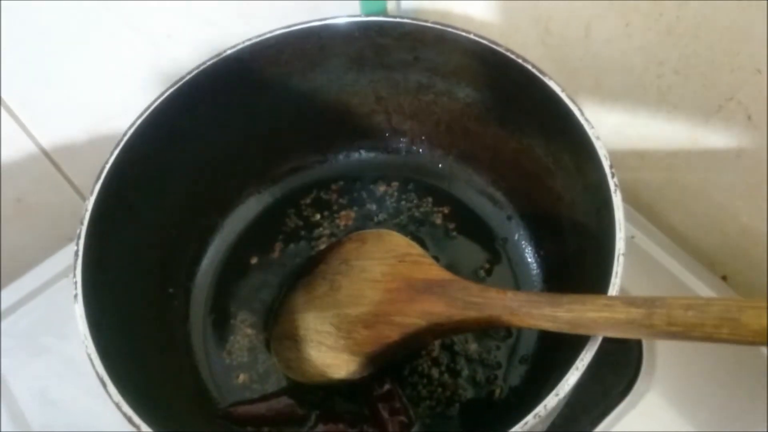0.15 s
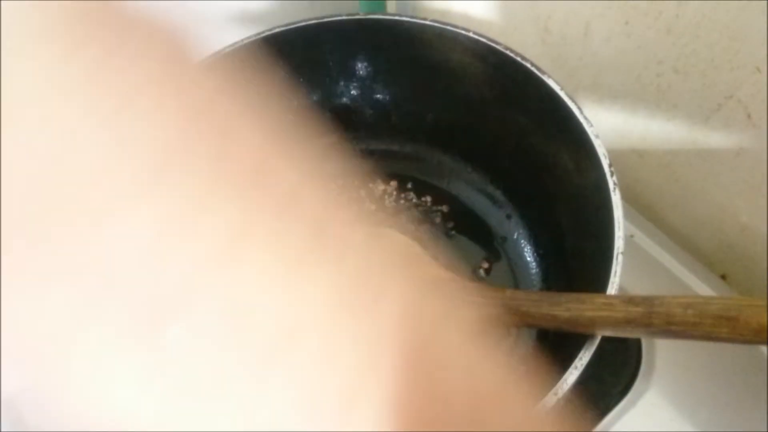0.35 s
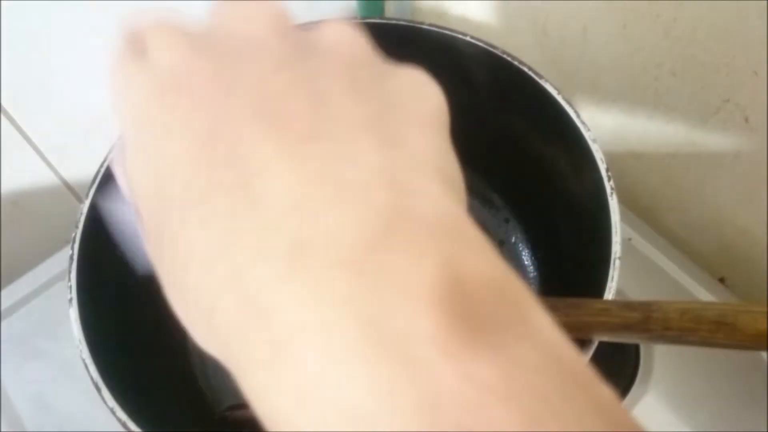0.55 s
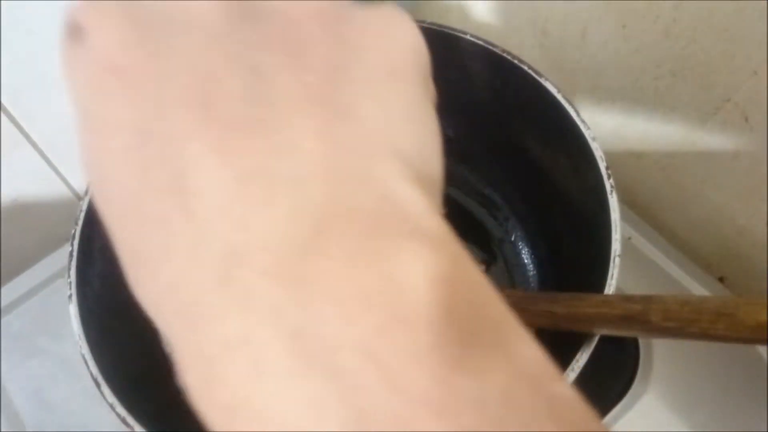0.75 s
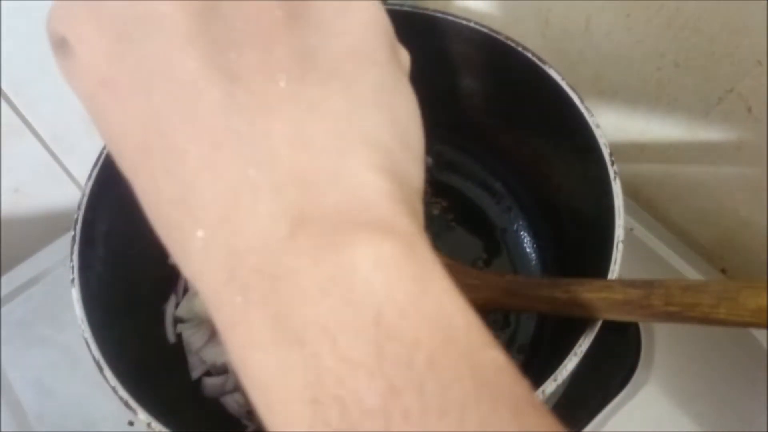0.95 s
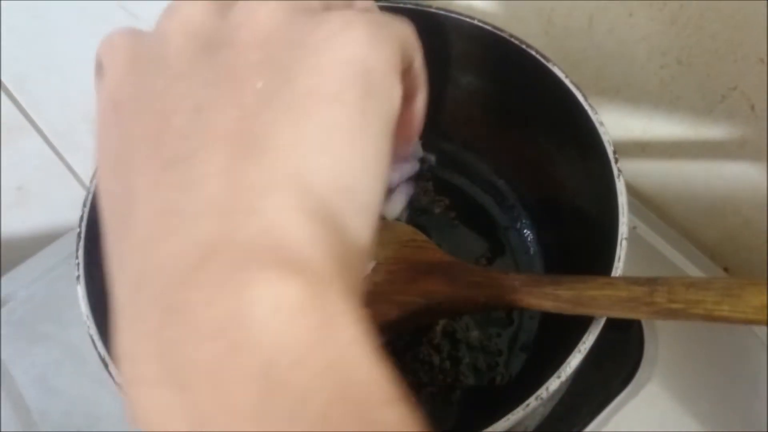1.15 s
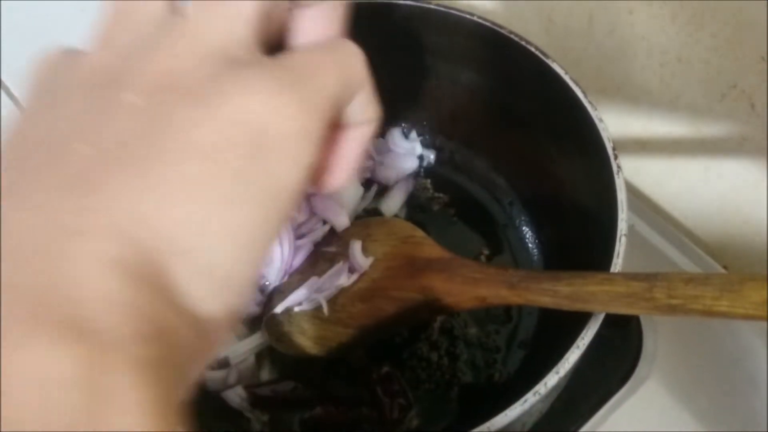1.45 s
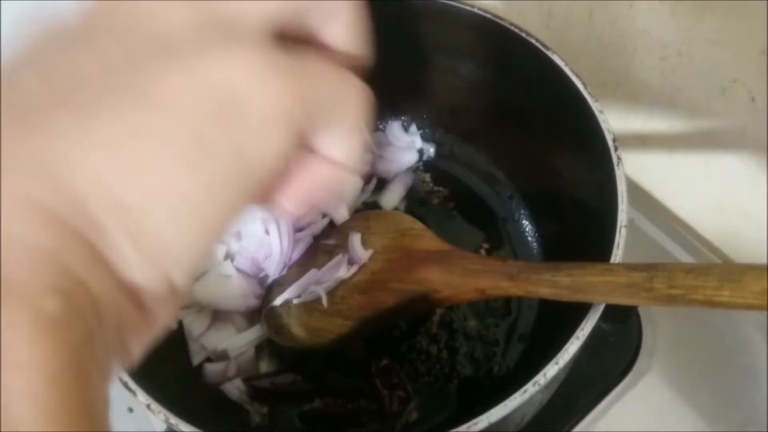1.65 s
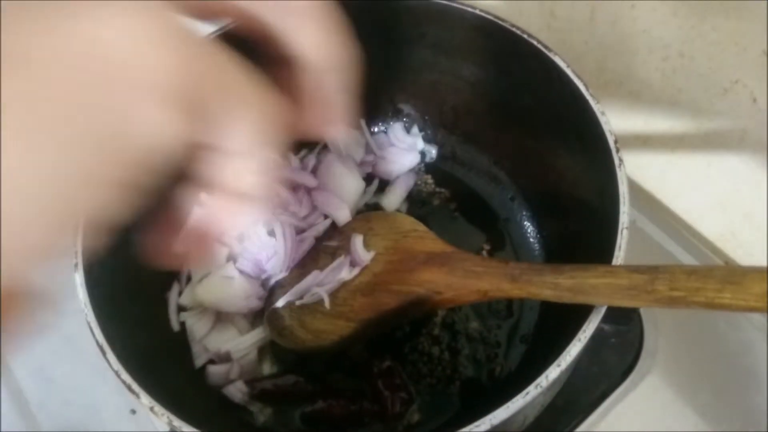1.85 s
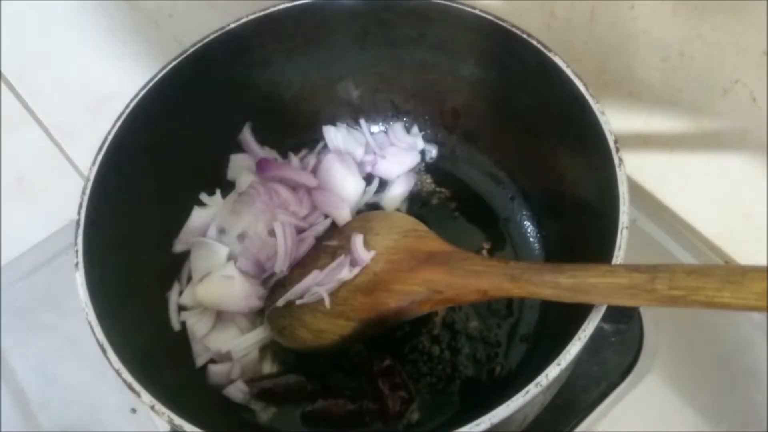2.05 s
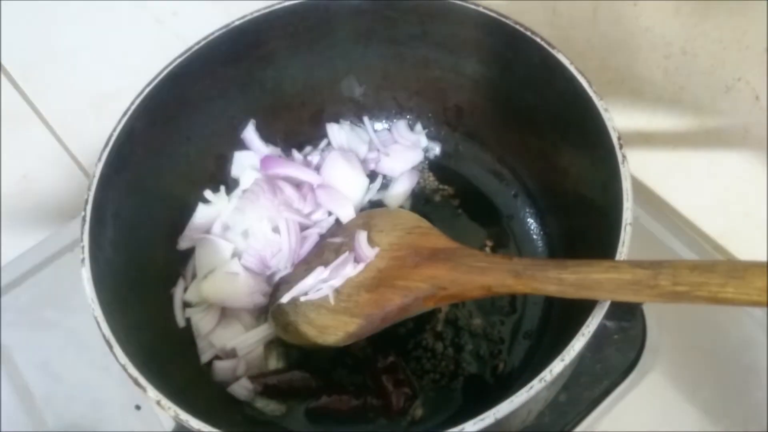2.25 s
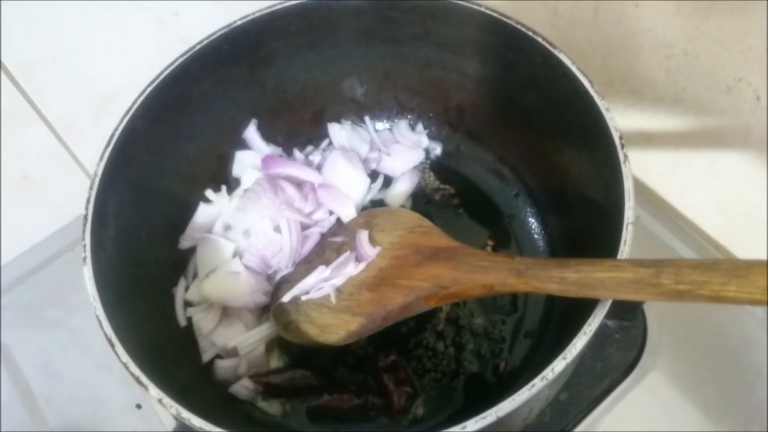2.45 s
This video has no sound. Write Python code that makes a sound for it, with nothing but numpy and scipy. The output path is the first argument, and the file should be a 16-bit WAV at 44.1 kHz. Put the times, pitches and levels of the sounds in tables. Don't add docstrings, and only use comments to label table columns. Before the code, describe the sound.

Onions dropped in hot oil sizzle fiercely after a hushed start with faint rustle and air puffs; the first surge eases into steady frying with snapping pops, heard close up in a small hard-walled kitchen.

```python
import sys
import numpy as np
from scipy import signal
from scipy.fft import rfft, irfft
from scipy.io import wavfile
from scipy.ndimage import uniform_filter1d

SR = 44100
rng = np.random.default_rng(int(sys.argv[2]) if len(sys.argv) > 2 else 0)


def attenuation_scalar(level_db):
    decades = np.asarray(level_db, float) / 20
    return 10 ** decades


def wrap_up_sound(samples):
    columns = np.atleast_2d(samples).T
    tamed = np.clip(columns, -1, 1)
    steps = np.round(tamed * 32767).astype(np.int16)
    wavfile.write(sys.argv[1], SR, steps)


N = 114660
LEAD_S, LEAD_SPREAD_S = .00022, .00015


def evened(x):
    return x / np.sqrt(np.mean(x ** 2) + 1e-20)


def read(points, hz):
    f, value = np.transpose(points)
    return np.interp(np.log(hz + 1), np.log(f), value)


def curve(table, col):
    table = np.array(table)
    return np.interp(np.arange(N) / SR, table[:, 0], table[:, col])


def add(mix, s, sound):
    part = mix[:, round(s * SR):][:, :sound.shape[1]]
    part += sound[:, :part.shape[1]]


def bins():
    return np.fft.rfftfreq(4096, 1 / SR)


def colour(x, db):
    cep = irfft(np.log(attenuation_scalar(np.maximum(db, -100))), axis=-1)
    cep[..., 1:2048] *= 2
    cep[..., 2049:] = 0
    response = irfft(np.exp(rfft(cep, axis=-1)), axis=-1)
    return signal.oaconvolve(x, response, axes=-1)[..., :N]


def high_pass(x, hz):
    return signal.sosfilt(signal.butter(2, hz, "high", fs=SR, output="sos"), x)


def slow(hz, order=4):
    low_pass = signal.butter(order, hz, fs=SR, output="sos")
    return evened(signal.sosfilt(low_pass, rng.standard_normal(N + 9000))[9000:])


def tail(t60, delay_s, seconds):
    t = np.arange(int(seconds * SR)) / SR
    h = rng.standard_normal((2, len(t))) * (rng.random((2, len(t))) < .15)
    h = h * attenuation_scalar(-60 * t / t60) * (t > delay_s)
    return h / np.linalg.norm(h, axis=1, keepdims=True)


def ring(hz, t60, rise_s, glide, count=700):
    t = np.arange(count) / SR
    loudness = (1 - np.exp(-t / rise_s)) * attenuation_scalar(-60 * t / t60)
    return loudness * np.sin(2 * np.pi * hz * t * (1 + glide * t / t60))


def place(sound, lead_s, pan_db):
    lag = int(np.clip(round(lead_s * SR), 0, 40))
    both = np.array([np.r_[sound, np.zeros(lag)], np.r_[np.zeros(lag), sound]])
    reflections = tail(.0078, .0004, .015)
    walls = signal.fftconvolve(both, reflections, axes=1)[:, :both.shape[1]]
    return (both + attenuation_scalar(-2) * walls) * attenuation_scalar(np.array([[pan_db / 2], [-pan_db / 2]]))


# (frequency [Hz], level [dB])
LEFT_PORT = [(250, -39), (900, -31), (1900, -17), (3200, -12), (5400, -1.5), (8000, -11.5), (12000, -20.5),
             (15000, -21.5)]
RIGHT_PORT = [(250, -40), (900, -32.5), (1900, -19.5), (3200, -15), (5800, -8), (7300, -11), (9400, -6.5),
              (14500, -25.5)]
# (frequency [Hz], width [Hz], level [dB])
HOLLOW = [(765, 190, 8), (1430, 125, 5.5), (1887, 287, -7.5), (2234, 135, 3), (4397, 100, 4.5),
          (5540, 420, 3)]


def ports():
    hz = bins()
    hollow = sum(db / (1 + (2 * (hz - f) / width) ** 2) for f, width, db in HOLLOW)
    return np.array([read(LEFT_PORT, hz), read(RIGHT_PORT, hz)]) + hollow


def bubbles(count=40):
    per_s, size_spread_db, biggest, clump_db = 2400, 5.5, 2.5, 1.8
    clump = attenuation_scalar(clump_db * slow(90) + 1.5 * slow(14))
    size = attenuation_scalar(size_spread_db * np.minimum(rng.exponential(1, N), biggest))
    size *= rng.choice([-1., 1.], N)
    size *= rng.random(N) < per_s * clump / SR
    kind = rng.integers(0, count, N)
    out, power = np.zeros((2, N)), 1e-9
    for k, hz in enumerate(np.geomspace(900, 15000, count)):
        cycles, glide, spot, pan = rng.random(4)
        note = ring(hz, (0.95 + 14 * cycles ** 3) / hz, 0.74 / hz, 0.44 * (glide - .6))
        lead_s = LEAD_S + LEAD_SPREAD_S * (2 * spot - 1)
        note = place(note / np.linalg.norm(note), lead_s, 5 * (pan - .5))
        power = power + abs(rfft(note, 4096)) ** 2
        out += signal.oaconvolve((size * (kind == k))[None], note, axes=1)[:, :N]
    flatten_db = -10 * np.log10(uniform_filter1d(power, 25, axis=1))
    return evened(colour(out, flatten_db))


# (time [s], level [dB], brightness [dB])
BOIL = [(.731, -73, -25), (.738, -43, 7), (.76, -30, 6), (.785, -26.5, 10), (.85, -23, 5.5),
        (.92, -17, 1.5), (1.05, -18, 1), (1.17, -18.5, -2), (1.29, -18.5, 0.5), (1.45, -23.5, 3.5),
        (1.53, -16, -4), (1.65, -25.5, 4.5), (1.82, -25, 1), (1.9, -24.5, 5.5), (2.0, -25.5, 2.5),
        (2.17, -23.5, 2.5), (2.3, -27.5, 3.5), (2.6, -25, 1)]


def fizz():
    level = attenuation_scalar(curve(BOIL, 1)) * (np.arange(N) / SR > BOIL[0][0])
    hiss = rng.standard_normal((2, N)) * attenuation_scalar(0.61 * slow(56))
    x = evened(colour(bubbles() + attenuation_scalar(-5) * hiss, ports()))
    top = signal.sosfiltfilt(signal.butter(2, 7000, "high", fs=SR, output="sos"), x)
    return np.sqrt(2) * level * (x + (attenuation_scalar(curve(BOIL, 2)) - 1) * top)


# (time [s], peak [dB], pitch [Hz], left over right [dB])
POPS = [(0.7427, -17, 9450, -28), (0.7618, -25, 5430, -0.5), (0.777, -4.5, 5640, 2), (0.88, -6, 5430, 4),
        (0.9793, -3, 4370, -5), (1.0028, 0, 6100, -7), (1.08, -11, 5870, 2.0), (1.1542, 4, 5500, 2),
        (1.1896, -7, 5260, 1.0), (1.2157, -2.5, 4520, -13), (1.408, 2, 5700, 11), (1.4512, -17, 5080, 7),
        (1.5096, 1.5, 4700, -4), (1.5833, 0, 5400, 10), (1.6896, -6.5, 5800, 20), (1.769, 2.5, 7320, 5),
        (1.8307, -1.5, 6200, 14), (1.8635, -3, 5500, 12), (1.8855, -3.5, 5800, 23), (1.9626, -7, 5570, 3),
        (2.037, -1.5, 5330, 19), (2.14, -5.5, 5470, 16), (2.1718, -7.5, 5570, 26), (2.2596, -1.5, 5570, 8),
        (2.396, -10, 5400, 20), (2.444, 2.5, 6400, 2), (2.4752, -8, 5450, 21), (2.4988, -9, 5360, 12),
        (2.5203, -3.5, 5960, 19), (2.5677, 2.5, 5260, 8.5)]


def pops():
    notes, sprays, t = np.zeros((2, N)), np.zeros((2, N)), np.arange(1400) / SR
    for s, db, hz, pan_db in POPS:
        glide, spot = rng.random(2)
        note = ring(hz, .003, 0.00019, -.15 * glide)
        lead_s = LEAD_S + LEAD_SPREAD_S * (2 * spot - 1)
        add(notes, s + 0.0012, attenuation_scalar(db - 8) * place(note / abs(note).max(), lead_s, pan_db))
        droplets = rng.standard_normal((2, len(t))) * (rng.random(len(t)) < .4)
        spray = droplets * attenuation_scalar(-60 * t / .008) + 3.6 * (t == 0)
        add(sprays, s + 0.00084, attenuation_scalar(db + 1) * spray)
    return high_pass(notes + colour(sprays, .92 * ports()), 1500)


# (time [s], peak [dB], pitch [Hz])
BLOOPS = [(0.8332, -11, 4660), (0.9438, -7, 4425), (0.9795, -7.5, 4380), (1.19, -16, 4500),
          (1.2155, -7, 4760), (1.256, -16, 4800), (1.282, -7.5, 4560), (1.3061, -10, 4200),
          (1.3309, -12.5, 4380), (1.3653, -8.5, 4580), (1.549, -4, 3290), (2.188, -11, 4710)]


def bloops():
    out = np.zeros((2, N))
    for s, db, hz in BLOOPS:
        waver = 1 + 0.66 * evened(uniform_filter1d(rng.standard_normal(1000), 70))
        note = ring(hz, 0.02, 0.0008, -0.18, count=1000) * waver
        add(out, s, attenuation_scalar(db - 4) * place(note / abs(note).max(), LEAD_S, 9))
    return high_pass(out, 1500)


# (time [s], peak [dB], pitch [Hz])
CRACKS = [(0.8186, -11, 4730), (0.8248, -9.5, 9820), (0.8716, -1.5, 5670), (0.8958, -6, 5500),
          (0.8994, -7, 5400), (0.913, -6, 5470), (0.9214, -6, 5700), (0.964, -9, 5470), (1.0077, -11, 5200),
          (1.0176, -4, 5560), (1.0279, -0.5, 5740), (1.1103, -7, 5730), (1.117, -5, 5600),
          (1.1298, -8, 5250), (1.1647, -11, 5230), (1.1699, -7, 5730), (1.272, -2, 6630),
          (1.2874, -1, 5640), (1.3028, 2, 5400), (1.3518, -7, 8280), (1.3842, -6.5, 5440),
          (1.3901, -7, 5550), (1.472, -8, 5530), (1.4805, -4, 5500), (1.49, -3.5, 5470), (1.5224, 2, 5040),
          (1.5322, -12, 5460), (1.54, -9, 5400), (1.5631, -17, 5380), (1.5918, -3.5, 4630),
          (1.6178, -7, 5340), (1.6282, -8, 6120), (1.6388, -2, 5900), (1.65, -15, 5470), (1.7177, -7, 5860),
          (1.7393, -10, 7840), (1.778, -6.5, 5860), (1.8174, -10, 5830), (1.841, -14, 5000),
          (1.8733, -2.5, 5400), (1.899, -14, 5400), (1.9374, -11, 5470), (1.9441, -9, 5340),
          (1.9956, -4, 9330), (2.0496, -2, 5380), (2.0582, -7, 8570), (2.0676, -8, 5700),
          (2.0738, -5, 6970), (2.0934, -4, 5840), (2.1677, -8.5, 8870), (2.18, -3.5, 5470),
          (2.283, -10, 5800), (2.2866, -6, 5770), (2.3032, -6.5, 5500), (2.3103, -4, 5630),
          (2.3258, -4, 5620), (2.3374, -6, 5700), (2.4499, -0.5, 5480), (2.4541, -8.5, 5500),
          (2.559, -8, 5680)]


def cracks():
    out, t = np.zeros((2, N)), np.arange(500) / SR
    snaps = rng.standard_normal((len(CRACKS), 2, len(t)))
    snaps = snaps * (attenuation_scalar(-60 * t / .0045) + 4.3 * (t == 0))
    snaps = colour(snaps, .9 * ports()[None])[..., :700]
    for (s, db, hz), snap in zip(CRACKS, snaps):
        note = ring(hz, .005, 0.00016, -.06 * rng.random())
        note = place(note / abs(note).max(), LEAD_S, 7 * np.sign(7000 - hz))
        add(out, s, attenuation_scalar(db - 2) * snap / abs(snap).max())
        add(out, s, attenuation_scalar(db - 5) * note)
    return out


# (time [s], peak [dB])
TICKS = [(1.0024, -1), (1.2134, -7), (1.25, -7), (1.4079, -7), (1.4858, -6), (1.591, -8), (1.7686, -10),
         (1.831, -8), (1.885, -10), (1.9353, -11), (1.962, -8), (1.9946, -11), (2.3209, -5), (2.4486, -9),
         (2.475, -14), (2.5208, -7)]


def ticks():
    out, t = np.zeros((2, N)), np.arange(200) / SR
    for s, db in TICKS:
        snap = high_pass(rng.standard_normal((2, len(t))) * attenuation_scalar(-60 * t / .003), 7500)
        snap = snap / abs(snap).max(axis=1, keepdims=True)
        add(out, s + .001, attenuation_scalar(db + 3) * snap * [[.5], [1]])
    return out


# (time [s], peak [dB], pitch [Hz])
THUMPS = [(0.975, -19.5, 791), (1.0, -13, 910), (1.211, -20, 770), (1.268, -14, 1440), (1.299, -14, 1280),
          (1.507, -13, 1450), (1.58, -37, 1490), (1.608, -24.5, 1430), (1.765, -24.5, 1430),
          (2.035, -54, 1460), (2.094, -40, 1360), (2.441, -18.5, 1490), (2.517, -16, 1370),
          (2.566, -26, 1430)]


def thumps():
    out, t = np.zeros((2, N)), np.arange(600) / SR
    for s, db, hz in THUMPS:
        slap = rng.standard_normal(len(t)) * attenuation_scalar(-60 * t / .003) + 24 * (t == 0)
        band = signal.butter(1, [520, 2.6 * hz], "band", fs=SR, output="sos")
        push = signal.sosfilt(band, slap)
        add(out, s + 0.003356, attenuation_scalar(db + 5) * place(push / abs(push).max(), LEAD_S / 2, 0))
    return out


# (frequency [Hz], width [Hz], level [dB])
PAN_FLOOR = [(277.6, 45, -3), (406, 70, -6), (153, 45, -14.5), (1100, 200, -9), (1600, 1400, -9)]


def landing():
    land_s, hold_s, t60, level_db = 0.7336, 0.097, 0.35, -43
    hz, u = bins(), np.arange(N) / SR - land_s
    modes = sum(attenuation_scalar(db) / (1 + (2 * (hz - f) / width) ** 2) for f, width, db in PAN_FLOOR)
    a, b = rng.standard_normal((2, N))
    tumble = np.array([a, 0.52 * a + 0.77 * b])
    rattle = evened(colour(tumble, 20 * np.log10(modes[None] + 1e-4)))
    rise = (u > 0) * np.clip(0.36 + 1.1 * u / 0.038, 0, 1)
    return rattle * rise * attenuation_scalar(level_db - 60 * np.maximum(u - hold_s, 0) / t60)


# (frequency [Hz], level [dB])
SPIT_COLOUR = [(290, -45), (800, -17), (1500, -18), (2200, -10), (4110, -11), (5780, 0), (7500, -9),
               (15000, -36)]


def spit():
    start_s, rise_s, hold_s, t60 = 0.425, 0.013, 0.008, 0.12
    u = np.arange(N) / SR - start_s
    after = np.maximum(u - rise_s - hold_s, 0) / t60
    fall = attenuation_scalar(-60 * after) + attenuation_scalar(-24 - 20 * after)
    shape = np.clip(u / rise_s, 0, 1) ** 1.5 * fall
    hiss = rng.standard_normal((2, N)) * attenuation_scalar(1.5 * slow(400))
    return attenuation_scalar(-41.5) * shape * evened(colour(hiss, read(SPIT_COLOUR, bins())[None]))


def rustle():
    band = signal.butter(2, [3000, 4000], "band", fs=SR, output="sos")
    swell = np.exp(-((np.arange(N) / SR - .235) / .06) ** 2)
    return attenuation_scalar(-70) * (swell + 0.36) * evened(signal.sosfilt(band, rng.standard_normal((2, N))))


# (time [s], level [dB])
AIR = [
    (0, -72),
    (.17, -70),
    (.24, -67.5),
    (.3, -71),
    (.42, -70.5),
    (.53, -68),
    (.72, -71.5),
]
# (frequency [Hz], level [dB])
HUSH_LEFT = [(120, 8.5), (1200, -4.5), (3500, 0.5), (5000, -4), (5700, 1), (7500, -7.5), (12000, -13),
             (15500, -11)]
HUSH_RIGHT = [(120, 6.5), (1200, -5.5), (3000, -4), (5000, -7.5), (7500, -7), (9200, 0), (12000, -7.5),
              (15000, -29)]
# (time [s], level [dB])
PUFFS = [
    (.15, -53),
    (.238, -39.5),
    (.47, -46.5),
    (0.626, -40.5),
]


def kitchen():
    hz, t = bins(), np.arange(N) / SR
    hush_db = np.array([read(HUSH_LEFT, hz), read(HUSH_RIGHT, hz)])
    hush = evened(colour(rng.standard_normal((2, N)), hush_db))
    a, b = slow(21.7, order=2), slow(21.7, order=2)
    boiling = np.clip((t - BOIL[0][0]) / 0.076, 0, 1)
    lumps = attenuation_scalar(-61) + attenuation_scalar(-57.5) * boiling
    puffs = np.zeros(N)
    for s, db in PUFFS:
        puffs += attenuation_scalar(db) * np.exp(-((t - s) / 0.031) ** 2) * np.cos(2 * np.pi * 12 * (t - s))
    right = lumps * a + puffs
    left = attenuation_scalar(-19) * (.5 * right + 0.72 * lumps * b)
    return attenuation_scalar(curve(AIR, 1) + 7.0) * hush + np.array([left, right])


def scene():
    pan = fizz() + pops() + bloops() + cracks() + ticks() + thumps() + landing() + spit()
    room = signal.fftconvolve(pan, tail(0.044, 0.0039, .3), axes=1)[:, :N]
    return pan + attenuation_scalar(-14) * room + rustle() + kitchen()


def top_cut(x):
    return signal.sosfilt(signal.butter(12, 15830, fs=SR, output="sos"), x)


def record(dry):
    knee, room = .7, .22
    bent = np.sign(dry) * (knee + room * np.tanh((abs(dry) - knee) / room))
    held = np.where(abs(dry) > knee, bent, dry)
    low_pass = signal.firwin(301, 15780, window=("kaiser", 9), fs=SR)
    mix = signal.oaconvolve(held, low_pass[None], "same")
    return top_cut(mix)


dry = scene()
out = record(dry)
wrap_up_sound(out)
```